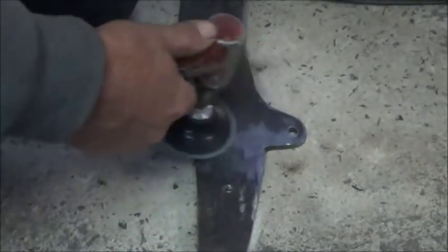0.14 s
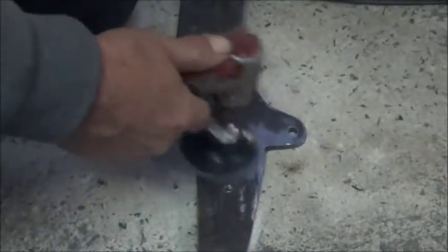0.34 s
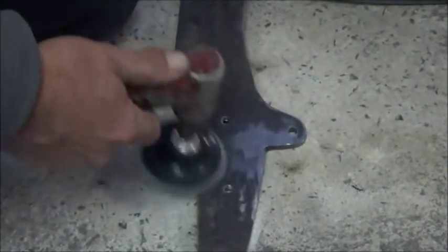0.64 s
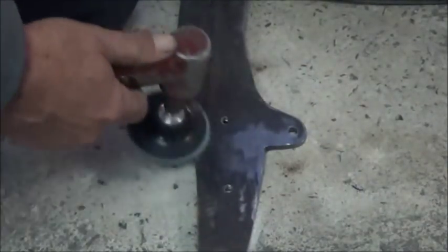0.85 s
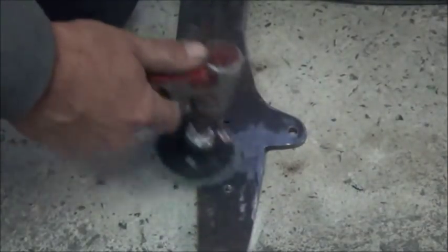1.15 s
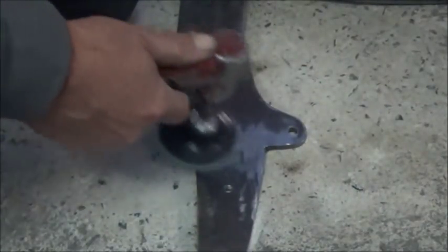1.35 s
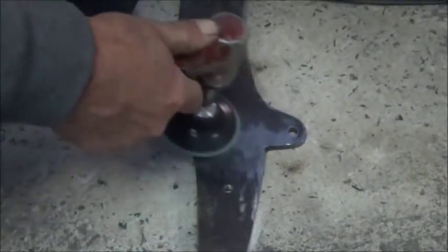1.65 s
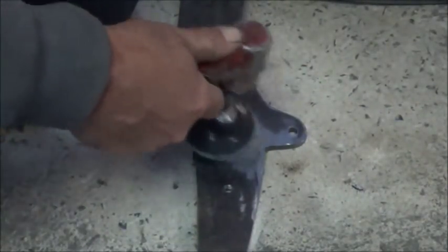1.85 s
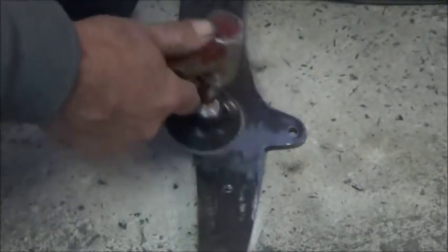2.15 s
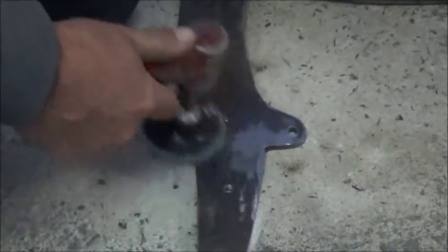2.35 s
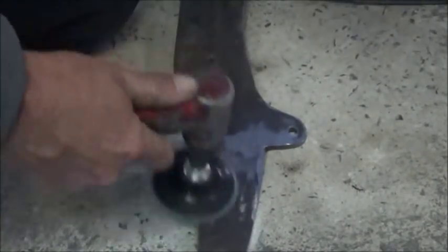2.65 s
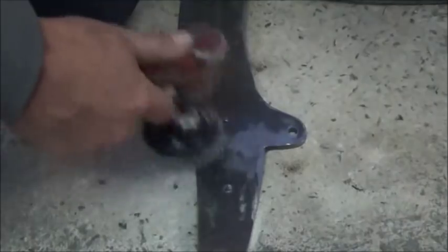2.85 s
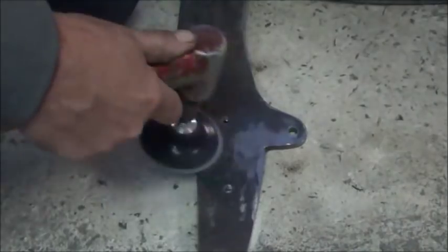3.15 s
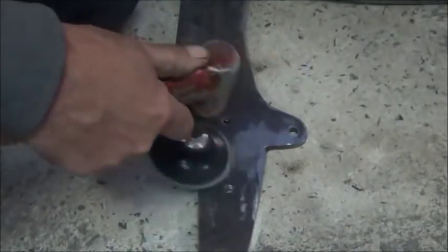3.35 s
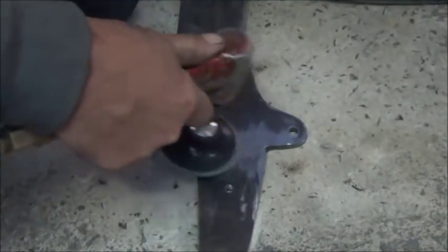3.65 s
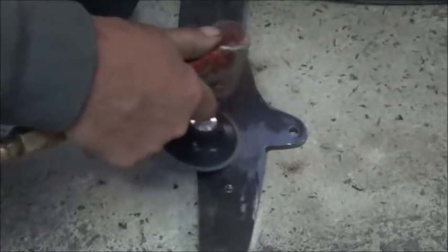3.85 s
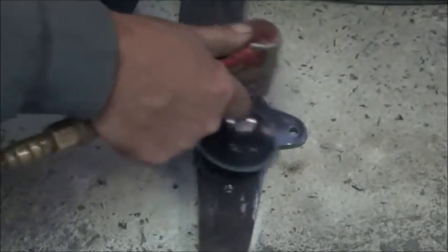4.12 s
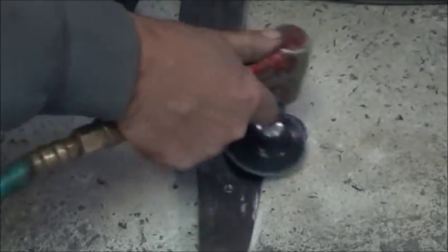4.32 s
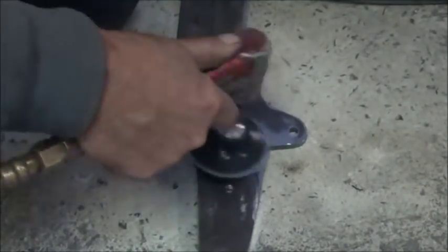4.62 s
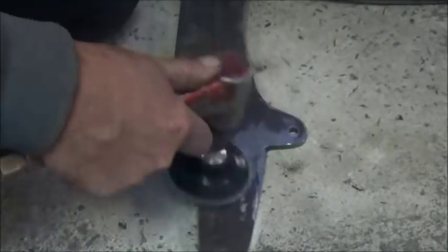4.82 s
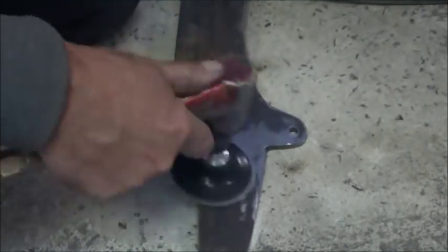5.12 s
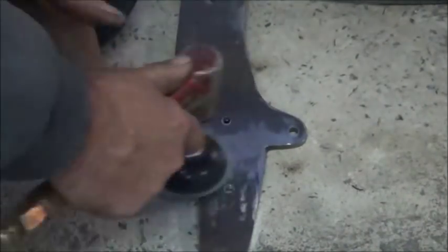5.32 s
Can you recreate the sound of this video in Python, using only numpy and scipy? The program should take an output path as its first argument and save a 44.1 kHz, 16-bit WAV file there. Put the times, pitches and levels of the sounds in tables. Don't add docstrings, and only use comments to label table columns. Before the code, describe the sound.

An air-driven grinder works an abrasive disc over a steel plate on a workshop floor. Its shrill, metallic whine wobbles about fifteen times a second, each bite pulling the pitch down while bright grit hiss swells. The whine thins briefly around 2.75 seconds, then returns strongly. Near the end the disc lifts and the motor races upward. Close stereo microphone, tool slightly left, faint short room echo.

```python
import sys
import numpy as np
from scipy import signal
from scipy.fft import rfft, irfft
from scipy.io import wavfile
from scipy.ndimage import uniform_filter1d

SR = 44100
rng = np.random.default_rng(int(sys.argv[2]) if len(sys.argv) > 2 else 0)


def master_out(mix):
    frames = np.transpose(np.atleast_2d(mix))
    ceiling = np.clip(frames, -1, 1)
    pcm = np.round(ceiling * 32767).astype(np.int16)
    wavfile.write(sys.argv[1], SR, pcm)


def invert_db(level):
    return 10 ** (np.asarray(level, dtype=float) / 20)


N = 241447
EIGHTH_S = SR // 8

# centre in Hz, width in Hz, gain in dB.
BODY = [(1080, 150, 5.0), (4850, 2520, 5.9), (6800, 770, 5.9), (8480, 340, 4.5), (9570, 780, -4.0),
        (10100, 1230, 8.4), (11650, 2250, 8.0), (12660, 1500, 4.0), (13970, 2240, -3.9), (14960, 1190, 4.2)]


def rms_one(x):
    return x / np.sqrt(np.mean(x ** 2) + 1e-20)


def in_time(rows):
    s, value = np.transpose(rows)
    return np.interp(np.arange(N) / SR, s, value)


def at_hz(points, hz):
    points_hz, value = np.transpose(points)
    return np.interp(np.log(hz), np.log(points_hz), value)


def drift(rate_hz):
    step, settle = 20, 2000
    pole = np.exp(-2 * np.pi * rate_hz * step / SR)
    noise = rng.standard_normal(N // step + settle + 2)
    slow = signal.lfilter([1], [1, -2 * pole, pole * pole], noise)[settle:]
    return np.interp(np.arange(N) / step, np.arange(len(slow)), rms_one(slow))


def one_pole(cut_hz, gain=1):
    pole = np.exp(-2 * np.pi * cut_hz / SR)
    return [gain * (1 - pole)], [1, -pole]


def colour(x, peaks):
    for hz, width_hz, db in peaks:
        w, a = 2 * np.pi * hz / SR, invert_db(db / 2)
        slack = np.pi * width_hz / SR
        x = signal.lfilter([1 + slack * a, -2 * np.cos(w), 1 - slack * a],
                           [1 + slack / a, -2 * np.cos(w), 1 - slack / a], x)
    return x


def evened(x):
    return x / np.sqrt(uniform_filter1d(x ** 2, size=EIGHTH_S) + 1e-4 * np.mean(x ** 2))


def bite_load():
    # time in seconds, bite number, speed lost in %.
    chatter = [(0.054, 0, 26.8), (0.255, 3, 28.7), (0.34, 4, 28.5), (0.483, 6, 13.8), (0.616, 8, 23.5),
               (0.819, 11, 15.5), (1.117, 15, 16.7), (1.382, 19, 23.5), (1.513, 21, 9.8), (1.636, 23, 33.7),
               (1.948, 28, 6.7), (2.157, 31, 15.5), (2.36, 34, 6.8), (2.52, 36, 19.2), (2.792, 39, 5.9),
               (2.859, 40, 12.6), (2.948, 41, 11.7), (3.304, 46, 21.1), (3.554, 50, 30.1),
               (3.685, 52, 25.0), (3.869, 55, 31.8), (3.992, 57, 26.1), (4.124, 59, 23.4),
               (4.182, 60, 22.3), (4.378, 63, 18.1), (4.448, 64, 30.4), (4.734, 68, 11.3),
               (4.938, 71, 17.2), (5.018, 72, 23.5), (5.161, 74, 19.3)]
    # bite number, extra speed lost in %, lateness
    # in ms.
    odd_bites = [(1, -3.2, -1.2), (2, 2.1, -1.1), (5, 7.4, 0.3), (7, 3.3, -3.0), (9, 0.2, -6.6),
                 (12, -1.7, -1.3), (14, 3.5, -1.6), (17, -1.0, 6.3), (18, -0.2, 4.4), (20, 3.6, -0.1),
                 (22, -0.6, 5.1), (25, -3.2, 1.8), (26, -0.5, 2.4), (27, -2.7, -2.8), (29, 6.2, -8.0),
                 (32, -3.3, 1.5), (33, 5.8, 1.4), (35, -1.3, 10.1), (37, -9.7, -8.9), (38, 1.4, -10.8),
                 (42, 3.7, 5.3), (43, -4.4, 3.8), (45, 2.2, 1.0), (47, 11.2, -0.7), (48, -0.5, -1.9),
                 (61, 4.8, -1.4), (62, 7.7, -1.2), (65, 1.2, -0.8), (67, 3.5, -4.2), (70, 5.6, 1.1)]
    slowing_ms, slowing_power = 15.95, 1.66
    recovery_ms, recovery_power = 38.75, 1.27
    usual_bounce_s, bounce_power = .068, .73
    usual_lost_pct, hard_power = 20, .21

    marked_s, number, marked_lost = np.transpose(chatter)
    every = np.arange(int(number[-1]) + 1)
    at_s = np.interp(every, number, marked_s)
    lost_pct = np.interp(every, number, marked_lost)
    for k, extra_pct, late_ms in odd_bites:
        lost_pct[int(k)] += extra_pct
        at_s[int(k)] += late_ms / 1000
    lost_pct = np.maximum(lost_pct, 0)

    haste = (np.gradient(at_s) / usual_bounce_s) ** bounce_power
    haste = haste * ((lost_pct + 5) / usual_lost_pct) ** hard_power
    load = np.zeros(N)
    for s, share, quick in zip(at_s, lost_pct / 100, haste):
        near = np.arange(max(int((s - .1) * SR), 0), min(int((s + .4) * SR), N))
        ms = (near / SR - s) * quick * 1000
        slowing = (abs(ms) / slowing_ms) ** slowing_power
        recovery = (abs(ms) / recovery_ms) ** recovery_power
        load[near] += share * np.exp(-np.where(ms < 0, slowing, recovery) / 2)
    return load


def motor_speed(load):
    # time in seconds, vane passes per second.
    free_run = [(0.0, 1989), (0.074, 2888), (0.678, 2313), (1.158, 2248), (1.273, 3152), (1.566, 2892),
                (1.701, 3210), (1.941, 2511), (2.053, 3126), (2.432, 2642), (2.9, 3248), (3.213, 2855),
                (3.575, 3411), (4.824, 2890), (5.193, 3076), (5.377, 3840), (5.434, 3419), (5.475, 3568)]
    return in_time(free_run) * (1 - load) / 4


def whine(shaft_hz, orders, flutter_db, tremble_hz):
    angle = 2 * np.pi * np.cumsum(shaft_hz + tremble_hz * drift(191)) / SR
    out = np.zeros(N)
    for turns, db in orders:
        turns = round(turns)
        audible = np.clip((.42 * SR - turns * shaft_hz) / 1000, 0, 1)
        level = invert_db(db + flutter_db * drift(42)) * audible
        out += np.sqrt(2) * level * np.sin(turns * angle + rng.uniform(0, 2 * np.pi))
    return out


def motor_lines(shaft_hz, bite, shrill_db):
    # order in turns of the shaft, level in dB.
    low_orders = [(1, -24.5), (2, -25), (4, -1.5), (6, -43), (7, -28), (8, -6), (12, 2)]
    high_orders = [(16, -5), (20, 0.2), (24, 2.5), (28, 4.5), (32, -7), (36, -17)]
    # centre in Hz, width in
    # Hz, gain in dB.
    floor_echo = [(1580, 340, -2.0), (1890, 470, 7.7), (2400, 130, -8.6), (2590, 500, 5.8),
                  (3050, 160, -4.2), (3560, 280, 5.7), (5600, 230, -5.3), (6010, 230, -3.9),
                  (7550, 790, -6.6), (8230, 370, -4.3), (9080, 590, -12.6), (13150, 710, 3.2),
                  (2377, 37, -7.5), (3200, 80, 0), (5680, 130, 5), (9590, 190, -11)]
    path = BODY + floor_echo
    low = whine(shaft_hz, low_orders, flutter_db=2.5, tremble_hz=1.99)
    low = invert_db(-34.5 + 3.0 * bite) * colour(low, path)
    shrill = whine(shaft_hz, high_orders, flutter_db=2.0, tremble_hz=1.153)
    shrill = invert_db(shrill_db + 2.94 + 4 * bite) * evened(colour(shrill, path))
    return low + shrill


def glance(x, lag_ms, cut_hz):
    late = np.interp(np.arange(N) - lag_ms * SR / 1000, np.arange(N), x)
    return signal.lfilter(*one_pole(cut_hz), late) * np.array([[1], [-1]])


def shop(x):
    t60_s, wall_cut_hz = .35, 6000
    out = np.zeros((2, N))
    lags = (rng.uniform(.015, .045, 12) * SR).astype(int)
    for k, lag in enumerate(lags):
        loop, state = x.copy(), [0.]
        b, a = one_pole(wall_cut_hz, invert_db(-60 * lag / SR / t60_s))
        for i in range(lag, N, lag):
            back, state = signal.lfilter(b, a, loop[i - lag:i], zi=state)
            loop[i:i + lag] += back[:N - i]
        out[k % 2] += (loop - x) * (-1) ** (k // 2)
    return out


def hiss(shaft_hz, bite, bite_db, patchy_db, puff):
    # frequency in Hz, density in dB per Hz.
    density = [(30, -27.5), (200, -27.5), (400, -20), (560, -29), (780, -14), (1050, -23), (1500, -12),
               (2800, -15.5),
               (4500, -10.8), (8000, -7.5), (12000, -1.8), (16000, 1.5)]
    # frequency in Hz, left-right likeness from 0 to 1.
    likeness = [(900, .999), (2000, 1), (6000, 0.83), (15000, 0.81)]
    out, together = 0, drift(9)
    edges_hz = 25 * 2 ** np.arange(0, 10, .5)
    white = rng.standard_normal((2, 2, N))
    for k, (low_hz, high_hz) in enumerate(zip(edges_hz, edges_hz[1:])):
        band = signal.butter(2, [low_hz, high_hz], "band", fs=SR, output="sos")
        mid, side = signal.sosfilt(band, white[k % 2])
        hz = np.sqrt(low_hz * high_hz)
        alike = np.clip(at_hz(likeness, hz), -1, 1)
        grit = np.clip(hz / 10000, 0, 1)
        swing_db = bite_db * bite + patchy_db * (together + drift(14))
        gain = invert_db(at_hz(density, hz) + grit * swing_db)
        out = out + gain * (np.sqrt(1 + alike) * mid + np.sqrt(1 - alike) * side * [[1], [-1]])
    vanes = np.cos(2 * np.pi * 4 * np.cumsum(shaft_hz) / SR)
    return rms_one(colour(out * (1 + puff * vanes), BODY))


def hums():
    # frequency in Hz, level in dB rms.
    tones = [(107.7, -78), (479, -71.5), (738, -78)]
    s = np.arange(N) / SR
    out = np.zeros(N)
    for hz, db in tones:
        out += invert_db(db) * np.sqrt(2) * np.sin(2 * np.pi * hz * s + 0.17 * drift(2.0))
    return out


def scene():
    # time in seconds, level of the shrill lines in dB.
    contact = [(0, -24), (.25, -23), (1.12, -24), (1.24, -25.5), (1.5, -23.5), (1.62, -23.5), (1.87, -23),
               (2.1, -26), (2.45, -23.5), (2.74, -37), (3.0, -31.5), (3.33, -22.5), (3.6, -25.5),
               (4.6, -26.5), (4.73, -30), (4.88, -26), (5.15, -27.5), (5.35, -42)]
    load = bite_load()
    bite = load - uniform_filter1d(load, size=EIGHTH_S)
    shaft_hz = motor_speed(load)
    shrill_db = in_time(contact)

    lines = motor_lines(shaft_hz, bite, shrill_db)
    echoes = invert_db(-16) * glance(lines, lag_ms=.45, cut_hz=6000)
    echoes += invert_db(-19) * shop(lines)

    octaves = np.log2(uniform_filter1d(shaft_hz, size=EIGHTH_S) / 550)
    hiss_db = -24.5 + 0.092 * (shrill_db - shrill_db.mean()) - 2.5 * octaves
    air = invert_db(hiss_db + 1.03) * hiss(shaft_hz, bite, bite_db=16, patchy_db=1.42, puff=0.3)
    left_right = invert_db(np.array([[.45], [-.45]]))
    return (lines + air) * left_right + echoes + hums()


def low_pass(x):
    return signal.sosfilt(signal.butter(12, 16280, fs=SR, output="sos"), x)


def record(dry):
    cutoff_hz, bass_alike_hz = 15730, 1000.
    hz = np.fft.rfftfreq(N, 1 / SR)
    mid_side = np.array([dry[0] + dry[1], dry[0] - dry[1]]) / 2
    mid, side = rfft(mid_side, axis=1) * (hz < cutoff_hz)
    side = side * hz ** 4 / (hz ** 4 + bass_alike_hz ** 4)
    mix = irfft(np.array([mid + side, mid - side]), N, axis=1)
    return low_pass(mix)


dry = scene()
out = record(dry)
master_out(out)
```